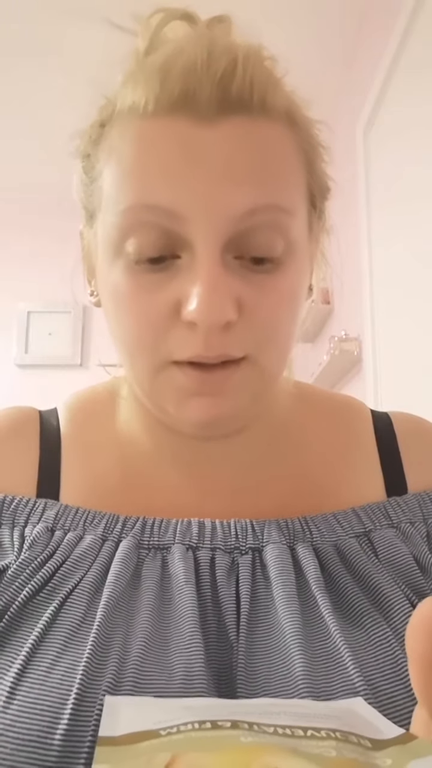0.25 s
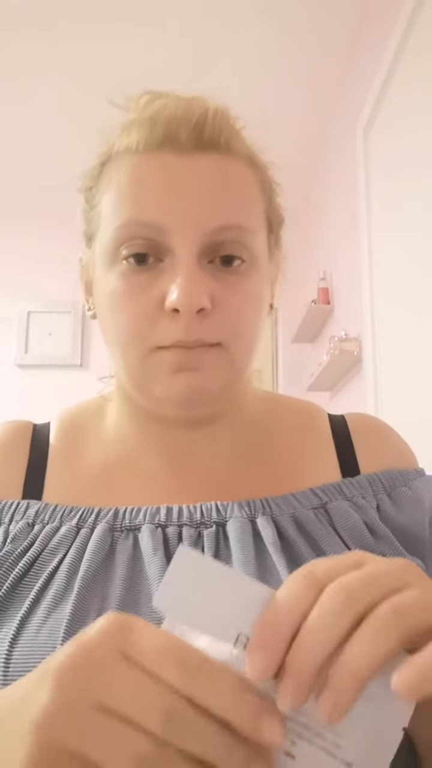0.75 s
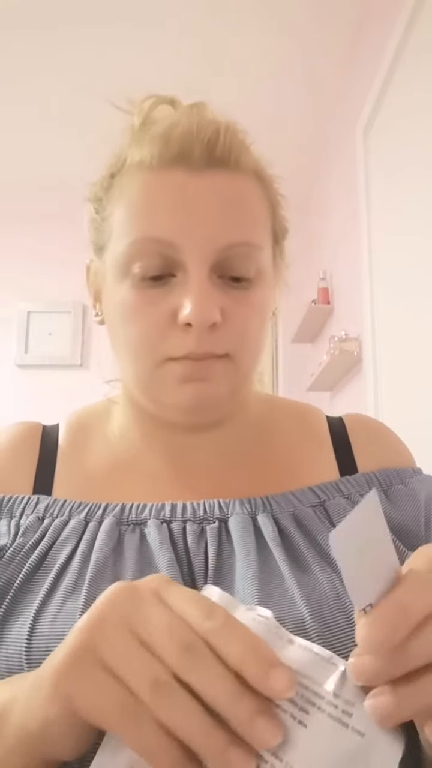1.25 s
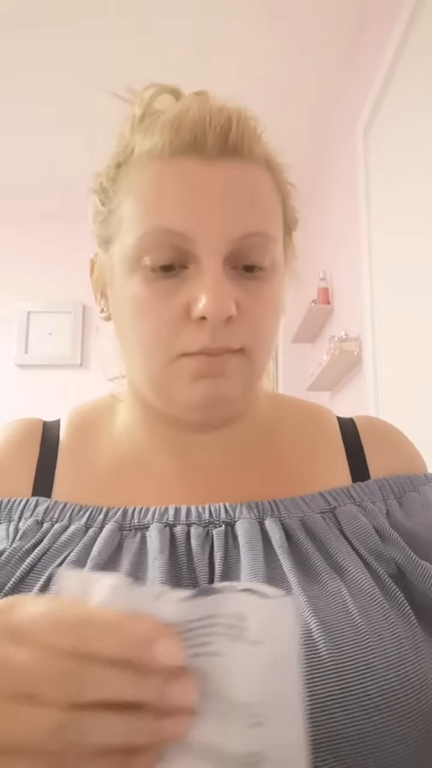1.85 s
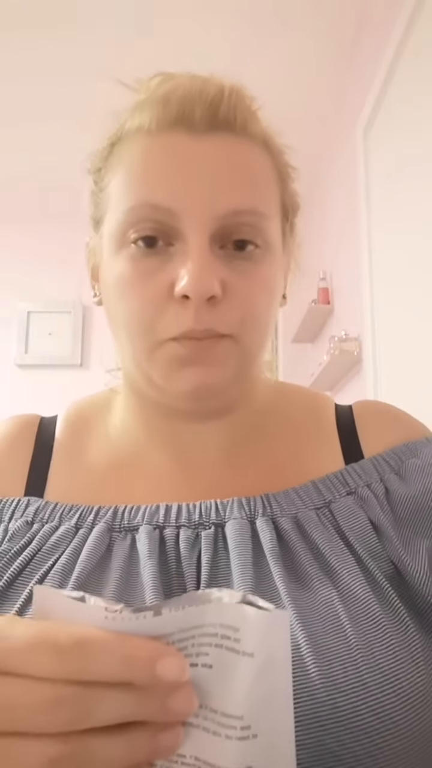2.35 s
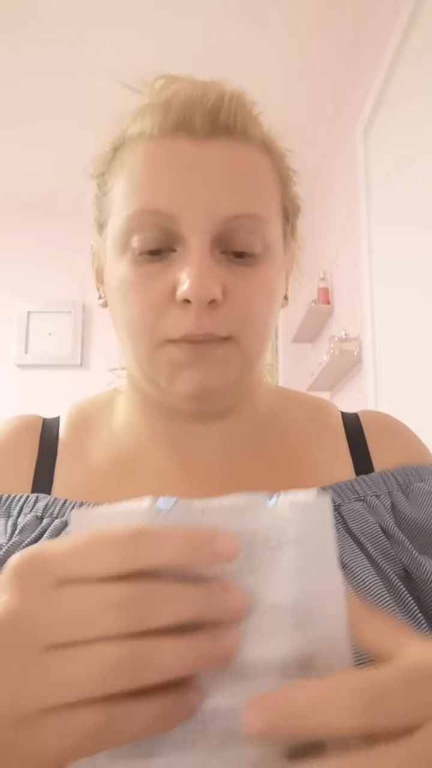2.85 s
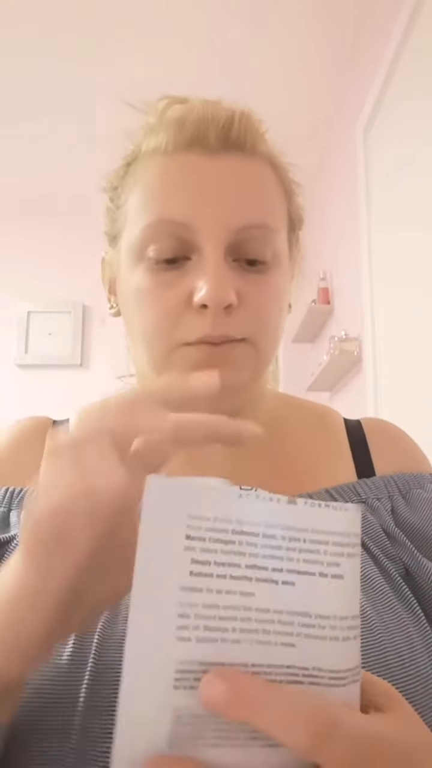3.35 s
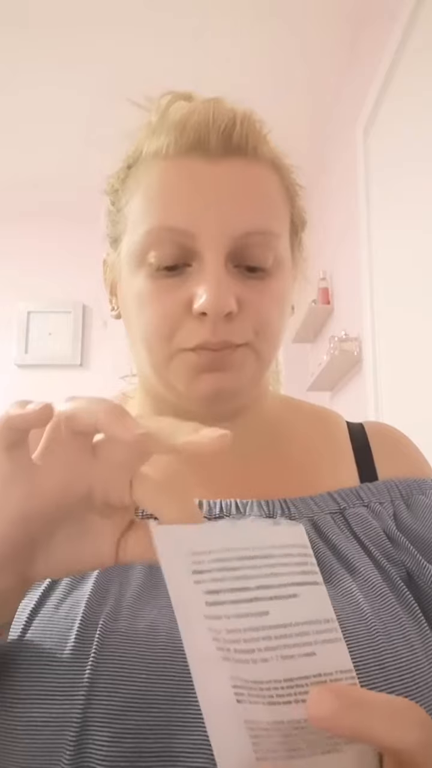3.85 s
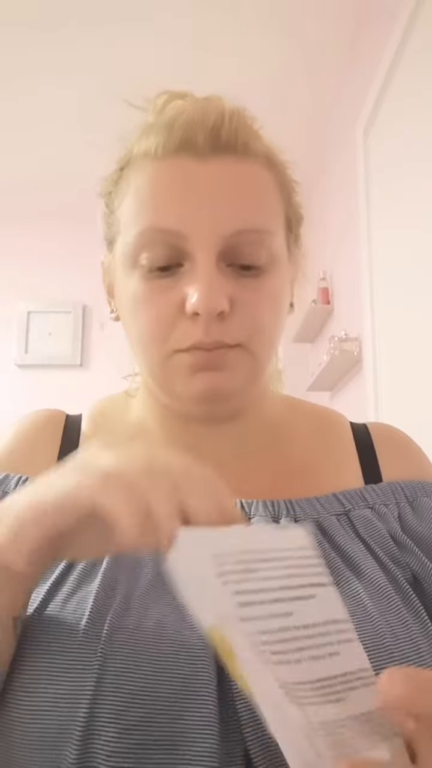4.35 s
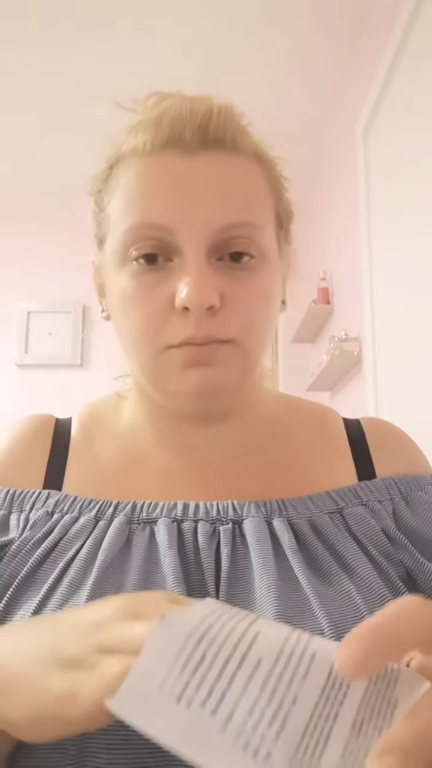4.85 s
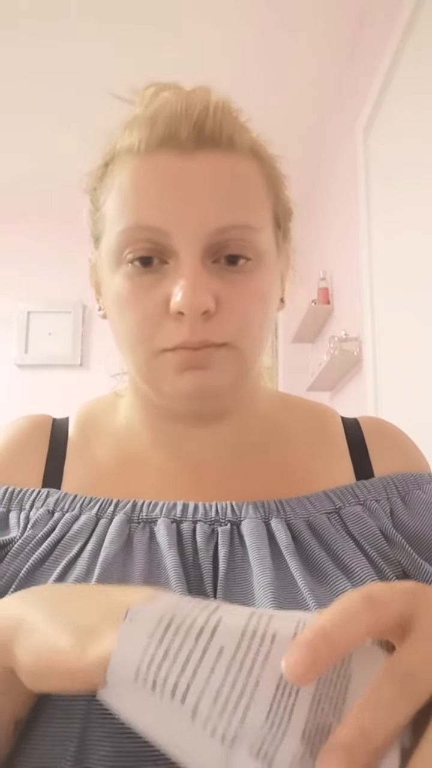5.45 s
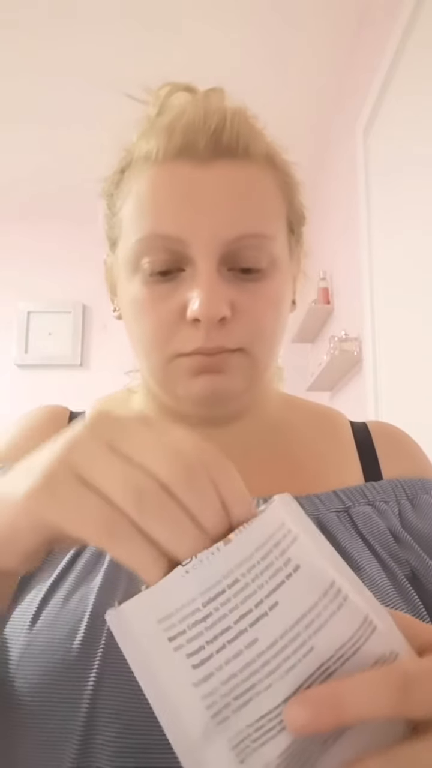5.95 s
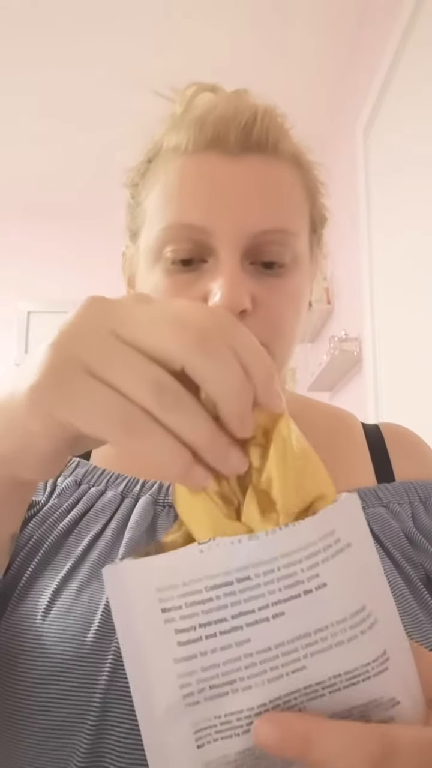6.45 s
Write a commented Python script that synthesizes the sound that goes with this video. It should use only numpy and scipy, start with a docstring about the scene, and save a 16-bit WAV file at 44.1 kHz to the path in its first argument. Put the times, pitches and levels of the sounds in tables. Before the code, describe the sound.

Quiet room noise with a barely audible mains hum and thin whine opens the scene, cutting to total silence from about 0.4 to 0.75 s. Close foil crackles begin at 0.8 s, with a sharp snap near 1.0. From 1.2 to 1.65 s the sachet rips: a hard jerk with bright cracks, then a steadier, fuller tear. A crisp double snap comes at 1.8. From 2 to 3 s there are sparse ticks and light rustles, with a small hollow pop and soft air puff at 2.6. Separate crinkles and dull pouch thumps follow from 3 to 4.3 s. Between 4.5 and 5.2 s comes the strongest dense crackling, peaking around 4.64 with low air thuds. Smaller crinkles fade until 6.2 s, when a very faint, thin swish marks the contents sliding out; then room hush and two weak ticks near 6.6. Short, dry room reflections.

```python
"""In a small quiet room, close to a phone, a foil sachet is torn open, turned over and emptied by hand.
Creases buckle in sharp snaps that excite damped modes of the stiff sheet and thump the pouch.
Tearing and rubbing are streams of tiny random slips, filtered by sheet, pouch and edge, with dry crinkles.
The pouch puffs air at two microphone ports and once rings hollow; the contents leave with a thin swish.
Room noise, a faint mains hum and a whine lie underneath; all sound is silent briefly before the handling."""
import sys
import numpy as np
from scipy import signal
from scipy.fft import rfft, irfft, next_fast_len
from scipy.io import wavfile
from scipy.ndimage import uniform_filter1d

SR = 44100
rng = np.random.default_rng(int(sys.argv[2]) if len(sys.argv) > 2 else 0)


def wav_record(signal):
    """Record a signal, one row per channel, as 16-bit PCM in the file named by sys.argv[1]."""
    frames = np.transpose(np.atleast_2d(signal))
    bounded = np.clip(frames, -1, 1)
    # unit amplitude maps onto the largest positive 16-bit level
    quanta = np.round(bounded * 32767).astype(np.int16)
    wavfile.write(sys.argv[1], SR, quanta)


N = 294838
TIME = np.arange(N) / SR

# room noise spectrum: f/Hz, relative level/dB
ROOM_NOISE = [(25, 2), (50, 5.5), (110, -3.5), (200, -15.5), (330, -20.5), (700, -20.5), (1200, -19.5),
              (1500, -24), (2000, -16), (4200, -30.5), (10000, -37.5), (16000, -40)]
ROOM_NOISE_DB = -61.5
# mains hum and an appliance's whine: f/Hz, rms level/dB
HUM_TONES = [(100, -74), (2000, -79.5)]
# response of the left port relative to the right one: f/Hz, level/dB
LEFT_PORT_RESPONSE = [(250, -1), (450, -2.5), (700, -9), (1250, -1.5), (2300, -4), (4500, -2.5),
                      (8000, -2.5), (11000, -12.5), (15000, -29)]
PORT_LAG_MS = 0.15
ROOM_T60_S, ROOM_TREBLE_T60_S = 0.27, 0.26
ROOM_DB, NEAR_WALLS_DB = -17, -5.5
SILENCE_START_S, SILENCE_END_S = .372, .757
TOP_HZ = 15700

# air pushed out by the flexing pouch: t/s, Gaussian half-width (to 1/e)/s, level/dB
AIR_PUFFS = [(1.285, 0.035, -48), (1.63, 0.052, -54), (2.611, 0.069, -46.5), (3.467, 0.064, -51),
             (3.626, 0.033, -42.5), (4.151, 0.02, -38.5), (4.27, 0.019, -46), (4.586, 0.043, -37),
             (4.68, 0.028, -48), (4.798, 0.056, -39.5)]
# air modes of the swollen pouch as it is turned over: f/Hz, T60/s, relative level/dB
HOLLOW_MODES = [(324, 0.067, -27), (510, 0.22, -49), (704, 0.2, -43.5), (945, 0.17, -39)]

# spectra of the sachet's parts: f/Hz, relative level/dB
POUCH_SPECTRUM = [(40, -14), (110, -2.5), (160, -2), (300, -2.5), (430, -4.5), (570, -5.5), (950, -11.5),
                  (1250, -27), (3000, -54.5)]
SHEET_SPECTRUM = [(300, -32.5), (750, -15.5), (1080, 1), (1500, -12), (1950, 3.5), (2500, -1), (3100, -1.5),
                  (4300, -12.5), (6000, -29.5), (12000, -50.5)]
EDGE_SPECTRUM = [(1500, -35), (4100, -10), (5600, 2.5), (7500, 0), (8700, 0), (12000, -5), (15500, -17)]
HISS_SPECTRUM = [(1500, -38), (4000, -6.5), (5400, 3), (8000, 2.5), (11000, 3), (15500, -8.5)]

# the rip across the top, a hard jerk and then a steadier pull: t/s, relative level/dB
RIP = [(1.214, -75.5), (1.223, -32.5), (1.289, -33), (1.33, -44.5), (1.385, -48), (1.43, -42.5),
       (1.616, -40.5), (1.68, -62.5)]
# the pouch sounds more as the rip opens it
RIP_BODY_DB, RIP_OPENING_DB_PER_S, RIP_HISS_DB = -9, 23.5, -4.5
# finger strokes that drag or flex the foil:
# t/s, length/s, then relative levels of sheet/dB, pouch body/dB, edge hiss/dB
FINGER_STROKES = [(0.823, 0.052, -51.5, -61.5, -75), (0.907, 0.08, -54, -64.5, -66),
                  (0.988, 0.014, -50, -58.5, -56), (1.811, 0.035, -37.5, -42.5, -40.5),
                  (2.044, 0.013, -46, -65, -48.5), (2.095, 0.063, -68.5, -71.5, -65),
                  (2.332, 0.011, -51, -58.5, -48), (2.378, 0.014, -63, -67.5, -64),
                  (2.531, .065, -42.5, -45, -49.5), (2.631, 0.014, -49.5, -53.5, -59),
                  (2.774, 0.0099, -41, -48.5, -47), (2.795, 0.0064, -62, -55, -61),
                  (3.056, 0.027, -61, -69, -58.5), (3.158, 0.047, -50, -70.5, -58.5),
                  (3.283, 0.0069, -41, -44, -47), (3.333, 0.011, -51, -55.5, -70),
                  (3.381, 0.035, -42, -51, -45.5), (3.484, 0.015, -45.5, -47, -65),
                  (3.594, 0.014, -37.5, -48, -44.5), (3.774, 0.017, -62, -64.5, -79),
                  (3.968, 0.062, -61, -66.5, -72), (4.046, .045, -46, -66.5, -49.5),
                  (4.132, 0.028, -42.5, -49, -62), (4.19, 0.042, -56, -64.5, -56),
                  (4.474, 0.061, -49.5, -74.5, -52), (4.545, 0.049, -41, -62.5, -40),
                  (4.62, 0.029, -30.5, -38, -34), (4.668, 0.093, -44.5, -49.5, -48.5),
                  (4.767, 0.066, -34.5, -41.5, -38), (4.891, 0.072, -40.5, -46.5, -46),
                  (4.992, 0.13, -45.5, -49.5, -49), (5.137, 0.055, -41, -46, -45),
                  (5.291, .08, -59, -64, -62.5), (5.442, .04, -58.5, -67.5, -63.5),
                  (5.51, 0.014, -43.5, -60.5, -70), (5.651, .024, -42, -50, -55),
                  (5.754, 0.12, -45, -52.5, -50.5), (5.919, 0.038, -47, -55, -52),
                  (6.015, 0.072, -52, -56.5, -60), (6.118, 0.12, -57, -67.5, -65)]
# every stroke grips quickly, holds, and dies away as the foil relaxes
GRIP_S, RELAX_DB_PER_S = 0.0089, 351.5
HANDLING_START_S, HANDLING_END_S = .8, 6.3

# single snaps of creases, from hard cracks to faint ticks:
# t/s, relative ring level/dB, ring f/Hz, relative pouch thud level/dB, relative crack level/dB
SNAPS = [(0.7873, -40, 2040, -53, -69), (0.836, -35.5, 914, -48.5, -56), (0.8455, -31.5, 2500, -40, -42),
         (0.9317, -46, 2280, -50.5, -71), (0.985, -24.5, 2410, -43, -30.5), (1.0315, -43.5, 2300, -72, -67),
         (1.2241, -26.5, 2660, -42, -37), (1.2542, -25, 2660, -38, -33), (1.259, -18, 2980, -40.5, -28),
         (1.4541, -33, 3200, -46.5, -33.5), (1.4775, -34.5, 2200, -44.5, -49),
         (1.5415, -34.5, 2660, -40, -52), (1.5775, -30, 2950, -45, -40), (1.6054, -25, 2840, -28, -29),
         (1.7983, -21, 2750, -39, -17.5), (1.828, -22.5, 3050, -39.5, -24),
         (2.061, -36, 2320, -59.5, -40.5), (2.3319, -48, 3970, -62, -49.5),
         (2.4341, -58.5, 2410, -72.5, -57.5), (2.531, -43, 2120, -48.5, -55.5),
         (2.5841, -38.5, 1440, -33, -52), (2.7608, -46, 2300, -62.5, -49), (2.7761, -41, 2240, -45, -35.5),
         (3.0078, -29.5, 2750, -75, -43), (3.0238, -37, 2210, -65, -56), (3.0483, -39, 2730, -59.5, -45),
         (3.1424, -46, 2330, -62, -73), (3.2662, -24.5, 1780, -59, -70), (3.4412, -32, 1800, -57.5, -43),
         (3.4832, -26, 2350, -50.5, -52), (3.5784, -32.5, 1980, -40, -56), (3.6178, -27, 1710, -33, -31.5),
         (3.7338, -50.5, 1934, -52.5, -76), (3.771, -36, 1830, -50.5, -55),
         (4.0706, -38, 2100, -69.5, -52.5), (4.1379, -25, 1830, -31, -35),
         (4.2588, -45.5, 2185, -50, -47.5), (4.5559, -25.5, 2350, -33.5, -23),
         (4.6386, -17, 2720, -24, -21), (4.6677, -30, 2980, -39.5, -33), (4.7629, -30, 1790, -42, -32.5),
         (4.819, -21.5, 1960, -31, -29), (5.1076, -42.5, 3870, -48.5, -40.5),
         (5.1521, -32, 1540, -39, -36.5), (5.3032, -49.5, 1200, -53, -74), (5.432, -33, 2000, -61, -57),
         (5.508, -27.5, 2300, -53, -48.5), (5.6085, -44.5, 2030, -53.5, -63), (5.6447, -31, 2650, -42, -46),
         (5.736, -29, 1910, -45, -52.5), (6.559, -55, 4350, -69.5, -82.5),
         (6.6794, -36.5, 1700, -53, -84.5)]
# modes of a patch of foil between creases: nominal ratio to the ring f, Q, relative level/dB
PATCH_MODES = [(.58, 1.5, -6.5), (.93, 5.4, 6), (1.25, 4.4, -10), (1.9, 7.7, -12)]
# where the hands snap the foil: t/s, left minus right level/dB
HAND_POSITIONS = [(0.8, 2.5), (1.0, -1), (1.6, 0.5), (1.8, 2.5), (2.05, 0), (2.8, -4), (3.3, 4), (4.6, 2.5),
                  (6.5, 3)]
# a crease whose thud equals its ring has this time scale; it halves for every BUCKLE_HALVING_DB less thud
BUCKLE_MS, BUCKLE_HALVING_DB = 2.3, 10


def undb(db):
    """Level definition: amplitude ratio = 10^(dB/20)."""
    return 10 ** (np.asarray(db) / 20)


def unit(x):
    """Normalisation to a root mean square of one."""
    return x / np.sqrt(np.mean(x ** 2))


def colour(points, size):
    """Minimum phase: a folded cepstrum gives a causal response through (f/Hz, level/dB) points."""
    hz, db = np.transpose(points)
    f = np.maximum(np.fft.rfftfreq(size, 1 / SR), 1)
    magnitude = undb(np.interp(np.log(f), np.log(hz), db))
    cepstrum = irfft(np.log(magnitude), size)
    cepstrum[1:size // 2] *= 2
    cepstrum[size // 2 + 1:] = 0
    return np.exp(rfft(cepstrum))


def shape(x, points):
    """Linear filtering: the spectrum of a long sound is multiplied by a colour."""
    size = 2 * next_fast_len(N // 2 + SR // 10, True)  # padded against wrap-around
    return irfft(rfft(x, size) * colour(points, size), size)[..., :N]


def walk(rate):
    """Slow random modulation: Gaussian knots, rate per second, joined by straight lines."""
    knots = np.arange(0, N / SR + 1, 1 / rate)
    return np.interp(TIME, knots, rng.standard_normal(len(knots)))


def add(out, x, s):
    """Superposition: a short sound of several channels is summed in at time s."""
    start = max(int(s * SR), 0)
    out[:, start:start + x.shape[1]] += x[:, :N - start]


def resonance(f, hz, q):
    """Damped oscillator: the response of one mode, unity at its resonance."""
    return 1 / (1 + 1j * q * (f / hz - hz / f))


def background():
    """Diffuse-field coherence: room air is alike at both ports in the bass; faint tones waver in phase."""
    mid, side = shape(rng.standard_normal((2, N)), ROOM_NOISE)
    side = shape(side, [(60, -25), (120, -18.0), (220, -8.0), (400, -0.5)])
    air = unit(np.array([mid + side, mid - side]))
    hum = 0
    for hz, db in HUM_TONES:
        phase = 2 * np.pi * (hz * TIME + rng.random()) + 0.33 * walk(5)
        hum = hum + undb(db) * np.sqrt(2) * np.sin(phase)
    return undb(ROOM_NOISE_DB) * air + hum


def room(x, first_s=0.0029, build_s=0.016, near_s=0.0054, near_hz=700, bass_db=1):
    """Reverberation: hands and arms scatter treble in milliseconds; walls add a short exponential tail."""
    t = TIME[:SR // 2]
    tail_noise, near_noise = rng.standard_normal((2, 2, len(t)))
    low = signal.lfilter(*signal.butter(1, 3000, fs=SR), tail_noise)
    high = tail_noise - low
    build = 1 - np.exp(-np.maximum(t - first_s, 0) / build_s)
    low_decay = undb(bass_db - 60 * t / ROOM_T60_S)
    high_decay = undb(-60 * t / ROOM_TREBLE_T60_S)
    tail = (low_decay * low + high_decay * high) * build
    scattered = near_noise * np.exp(-t / near_s) * (t > .001)
    near = signal.lfilter(*signal.butter(2, near_hz, "high", fs=SR), scattered)
    response = undb(ROOM_DB) * unit(tail) + undb(NEAR_WALLS_DB) * unit(near)
    return signal.fftconvolve(x, response / np.sqrt(len(t)), axes=1)[:, :N]


def puffs(centre_hz=62):
    """Volume flow: the flexing pouch makes slow swells of low noise, the same at both ports."""
    swell = sum(undb(db) * np.exp(-((TIME - s) / length) ** 2) for s, length, db in AIR_PUFFS)
    spectrum = [(15, -9), (centre_hz, 0), (130, -7), (300, -26), (1000, -65)]
    return swell * unit(shape(rng.standard_normal(N), spectrum))


def sliding_out(at_s=6.22, length_s=0.039, level_db=-61):
    """Sliding friction: the contents pass over the torn rim with a thin, treble swish."""
    swish = shape(rng.standard_normal((2, N)), [(5000, -38.5), (9300, 1), (10900, 10), (14000, -18.5)])
    return undb(level_db) * np.exp(-((TIME - at_s) / length_s) ** 2) * unit(swish)


def hollow_pop(at_s=2.584):
    """Cavity resonance: the pouch's wall flips over and the air inside rings in decaying sines."""
    t = TIME[:SR // 4]
    ring = sum(undb(db - 60 * t / t60) * np.sin(2 * np.pi * hz * t) for hz, t60, db in HOLLOW_MODES)
    out = np.zeros((2, N))
    add(out, np.array([ring, ring]), at_s)
    return out


def handling():
    """Power addition of rip and strokes: amplitudes of sheet, pouch body and edge hiss."""
    rip_s, rip_db = np.transpose(RIP)
    rip = np.interp(TIME, rip_s, rip_db, left=-120, right=-120)
    opened_s = np.clip(TIME, rip_s[0], rip_s[-1]) - rip_s[0]
    body = rip + RIP_BODY_DB + RIP_OPENING_DB_PER_S * opened_s
    power = undb([rip, body, rip + RIP_HISS_DB]) ** 2
    t = TIME[:SR // 2] - GRIP_S
    for s, length, *levels in FINGER_STROKES:
        grip = np.minimum(1 + t / GRIP_S, 1)
        relax = undb(-RELAX_DB_PER_S * np.maximum(t - length, 0))
        add(power, (undb(levels)[:, None] * grip * relax) ** 2, s - GRIP_S)
    return np.sqrt(power)


def crinkles(rate=70, centre_hz=2000, spread=0.35, scatter_db=4):
    """Impulsive buckling: tiny creases tick at random, each at its own pitch, and die within a few cycles."""
    out = np.zeros((2, N))
    delay_s = np.array([[PORT_LAG_MS / 1000], [0]])
    t = np.maximum(TIME[:SR // 100] - delay_s, 0)
    count = int(rate * N / SR)
    for moment, pitch, strength, turn in rng.random((count, 4)):
        hz = centre_hz * np.exp(2 * spread * (2 * pitch - 1))
        flick = np.sin(2 * np.pi * hz * t) * np.exp(-t * hz) * np.sign(turn - .5)
        # the slope of the flick, evened out over pitch
        tick = np.sqrt(hz) * np.diff(flick) / np.sin(np.pi * hz / SR)
        add(out, undb(2 * scatter_db * strength) * tick, moment * N / SR)
    return unit(out)


def slip_stream(rate, scatter_db):
    """Stick-slip as a random pulse train: tiny slips, a few much stronger than the rest."""
    strength = undb(scatter_db * np.minimum(rng.exponential(size=N), 5))
    force = strength * rng.standard_normal(N)
    return unit(force * (rng.random(N) < rate / SR))


def rubbing(levels, sheet_db=-2, body_db=-2, hiss_db=-1, crinkle_db=-6, rate=3500, scatter_db=2.5,
            wander_db=6.0, pan_db=1.95, taut_at_s=0.9, taut_length_s=.12, taut_db=6):
    """Friction-driven resonance: foil drags and crinkles, and bending makes its bands come and go."""
    sheet, body, hiss = levels
    shared = slip_stream(rate, scatter_db)
    lag = int(PORT_LAG_MS * SR / 1000)
    own = np.array([slip_stream(rate, scatter_db) for _ in range(2)])
    slips = np.array([np.roll(shared, lag), shared]) + own
    # pulled taut ahead of the rip, the sheet sounds higher
    tilt = taut_db * np.exp(-((TIME - taut_at_s) / taut_length_s) ** 2)
    edges = np.geomspace(400, 6400, 13)
    bent = 0
    for lo, hi in zip(edges[:-1], edges[1:]):
        band = signal.sosfilt(signal.butter(1, (lo, hi), "band", fs=SR, output="sos"), slips)
        band_db = wander_db * walk(20) + tilt * np.log2(min(lo / 2500, 1)) + tilt / 2
        bent = bent + undb(band_db) * band
    ringing = undb(sheet_db) * unit(shape(bent, SHEET_SPECTRUM))
    foil = sheet * (ringing + undb(crinkle_db) * crinkles())
    foil = foil + hiss * undb(hiss_db) * unit(shape(slips, HISS_SPECTRUM))
    pouch = body * undb(body_db) * unit(shape(shared + 0.18 * slips, POUCH_SPECTRUM))
    return foil * undb([[pan_db / 2], [-pan_db / 2]]) + pouch


def random_snaps(levels, span, strength_db, scatter_db, ring_hz, count):
    """Stress-driven buckling: further creases snap at random, as strongly as the foil is worked."""
    rows = []  # columns as in SNAPS
    for k, (moment, strength, pitch) in enumerate(rng.random((count, 3))):
        s = span[0] + (span[1] - span[0]) * (k + moment) / count
        worked_db = 20 * np.log10(levels[:, int(s * SR)])
        ring, thud, crack = worked_db + strength_db + scatter_db * (2 * strength - 1)
        rows.append((s, ring, ring_hz * 2 ** (pitch - .5), thud, crack))
    return rows


def snaps(rows, thud_db=-1, slip_db=-1, split_ms=0.75, lag_scatter_ms=0.064, detune=0.074,
          damping_ratio=1.745, size=2048, count=40):
    """Snap-through buckling: a main slip amid smaller ones rings its patch of foil and thumps the pouch."""
    out = np.zeros((2, N))
    f = np.maximum(np.fft.rfftfreq(size, 1 / SR), 1)
    pouch, edge = colour(POUCH_SPECTRUM, size), colour(EDGE_SPECTRUM, size)
    lead_s, level_s = .015, .008  # room for early slips; span over which a level is the rms
    for s, ring, hz, thud, crack in rows:
        buckle_ms = BUCKLE_MS * 2 ** (min(thud - ring, 0) / BUCKLE_HALVING_DB)
        pan = np.interp(s, *np.transpose(HAND_POSITIONS))
        when = np.clip(rng.laplace(size=count) * buckle_ms / 1000, -lead_s, lead_s)
        force = rng.standard_normal((3, count)) * undb(slip_db) * np.sqrt(buckle_ms / count)
        slips = np.zeros((2, size))
        # small slips face the two ports differently; the main one reaches both
        slips[:, ((lead_s + when) * SR).astype(int)] = force[0] + 0.82 * force[1:]
        slips[:, int(lead_s * SR)] = rng.choice([-1, 1])
        drive = rfft(slips)
        lag_s = (PORT_LAG_MS + lag_scatter_ms * rng.standard_normal()) / 1000
        drive[0] *= np.exp(-2j * np.pi * f * lag_s)
        patch = 0
        for ratio, q, db in PATCH_MODES:
            mode_hz = hz * ratio * np.exp(detune * rng.standard_normal())
            patch = patch + undb(db) * resonance(f, mode_hz, q)
        # a small patch radiates little bass, and the laminate damps what lies far above its modes
        radiation = 1 / (1 + 0.28 * hz / (1j * f)) ** 2
        damping = signal.freqs(*signal.butter(4, damping_ratio, analog=True), f / hz)[1]
        patch = patch * radiation * damping
        # the treble is spread over the moment in which the kink runs along the crease
        kink = rfft(rng.standard_normal(size) * np.exp(-TIME[:size] * 1000 / split_ms))
        parts = (patch, ring), (pouch, thud + thud_db), (edge * kink, crack)
        sound = sum(undb(db) * unit(irfft(drive * response)) for response, db in parts)
        sound = sound * np.sqrt(level_s * SR / size)
        add(out, sound * undb([[pan / 2], [-pan / 2]]), s - lead_s)
    return out


def scene():
    """Superposition of direct sound, room and background, at a clear right port and a duller left one."""
    levels = handling()
    foil = rubbing(levels) + hollow_pop() + sliding_out()
    creases = random_snaps(levels, (HANDLING_START_S, HANDLING_END_S),
                           strength_db=-2.5, scatter_db=5, ring_hz=1900, count=150)
    fibres = random_snaps(levels, (RIP[0][0], RIP[-1][0]),
                          strength_db=2.5, scatter_db=3.5, ring_hz=2530, count=22)
    foil = foil + snaps(SNAPS + creases + fibres)
    left, right = foil + room(foil)
    return np.array([shape(left, LEFT_PORT_RESPONSE), right]) + puffs() + background()


def record(dry):
    """Saturation and band limiting: after a silent gap, peaks are rounded and the top is cut."""
    sounding = (TIME < SILENCE_START_S) | (TIME > SILENCE_END_S)
    gate = uniform_filter1d(1. * sounding, size=200)  # short ramps at both ends of the gap
    rounded = .85 * np.tanh(gate * dry / .85)
    return signal.sosfilt(signal.ellip(8, .2, 70, TOP_HZ, fs=SR, output="sos"), rounded)


dry = scene()
out = record(dry)
wav_record(out)
```